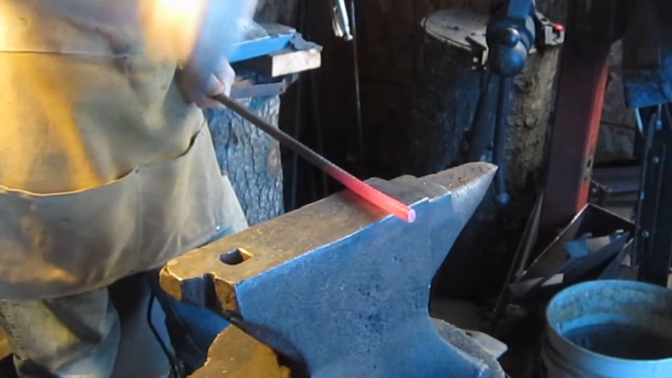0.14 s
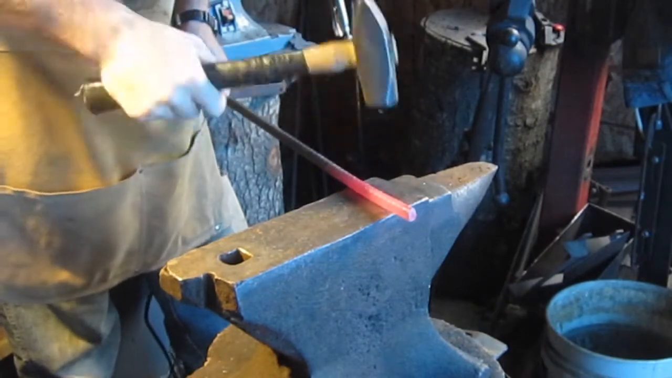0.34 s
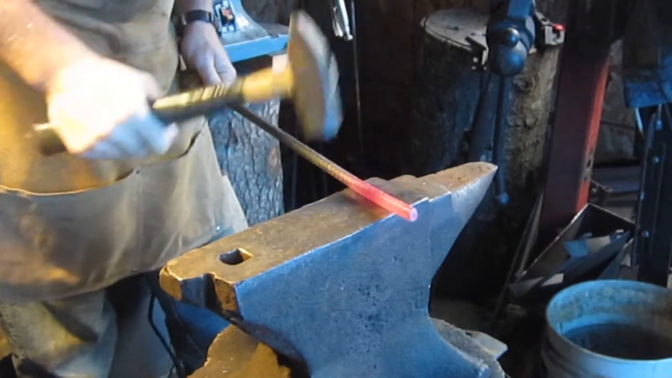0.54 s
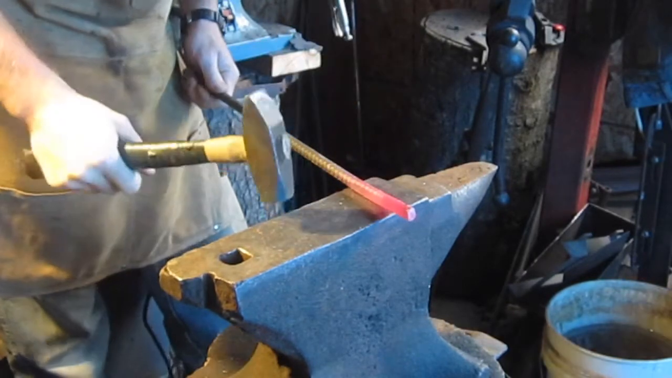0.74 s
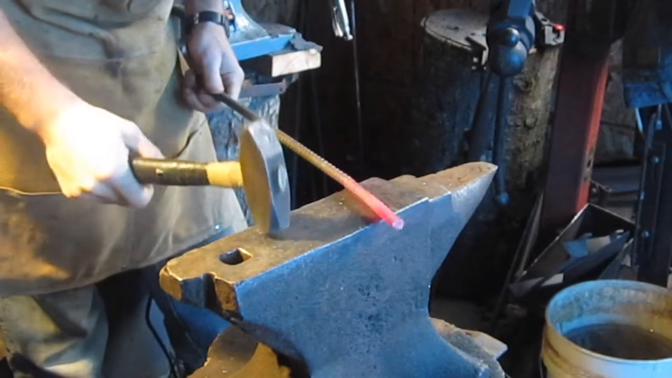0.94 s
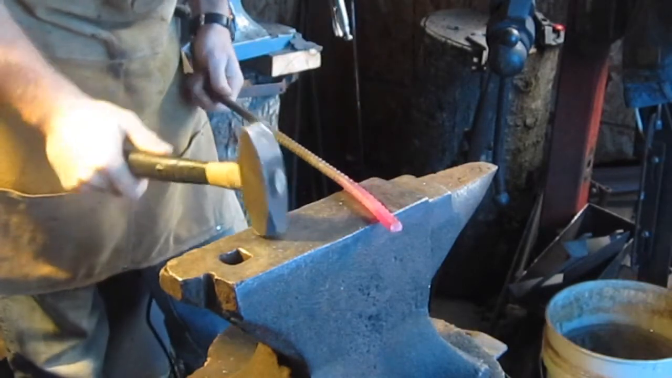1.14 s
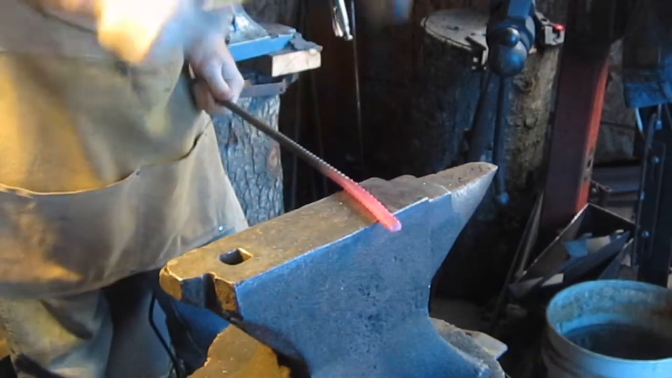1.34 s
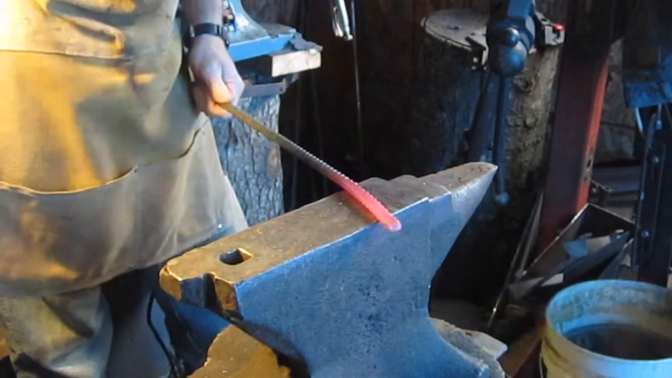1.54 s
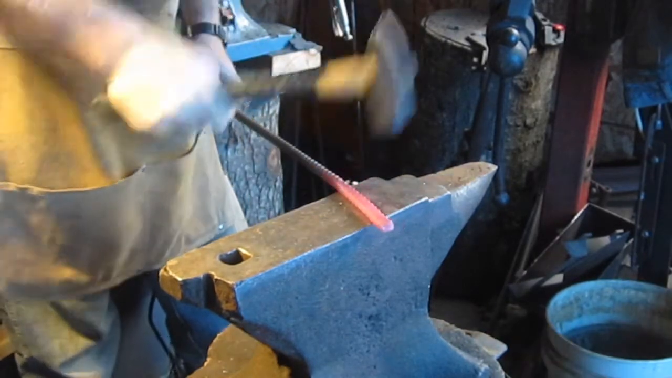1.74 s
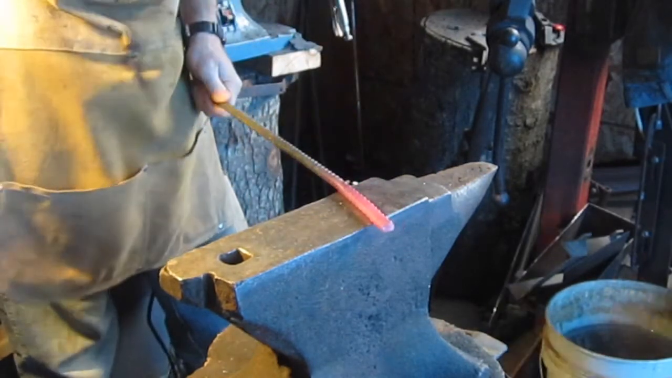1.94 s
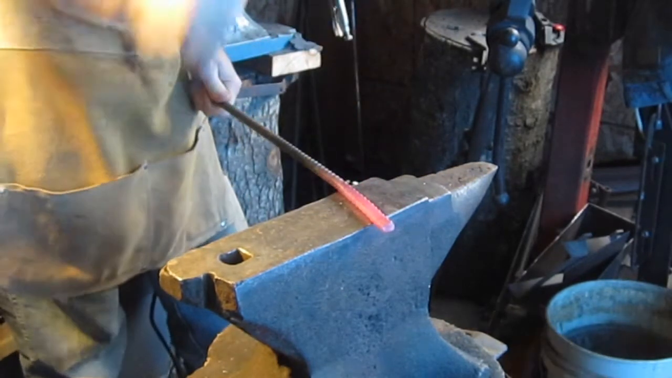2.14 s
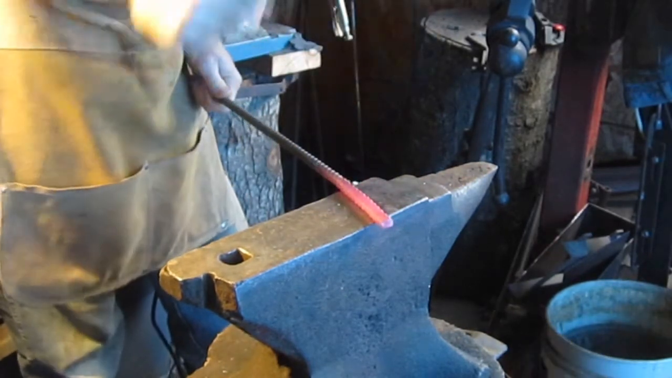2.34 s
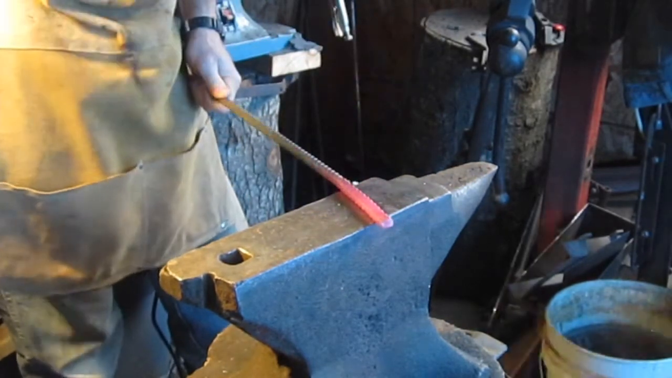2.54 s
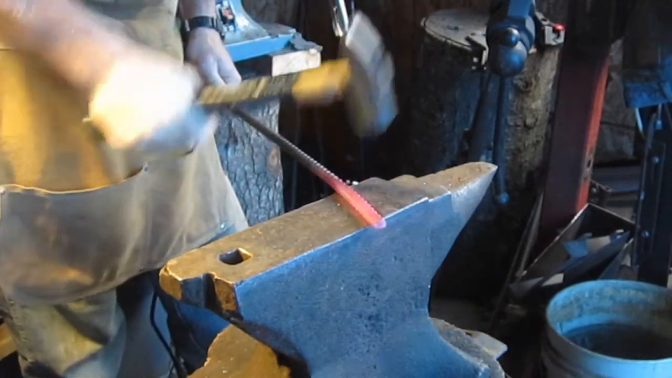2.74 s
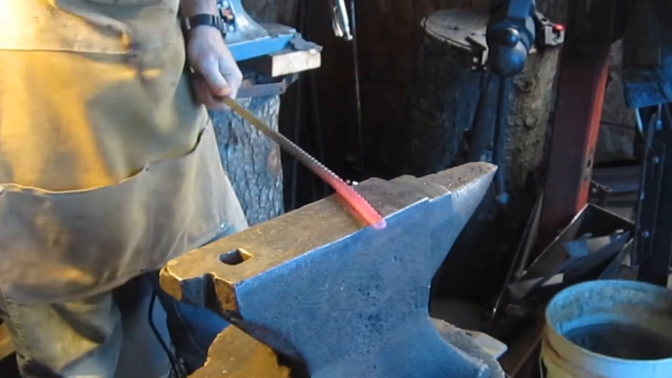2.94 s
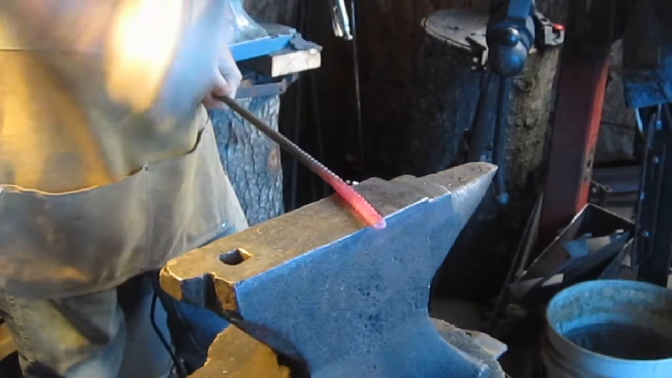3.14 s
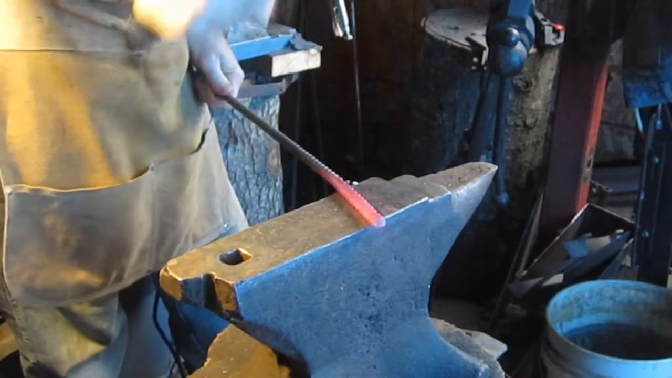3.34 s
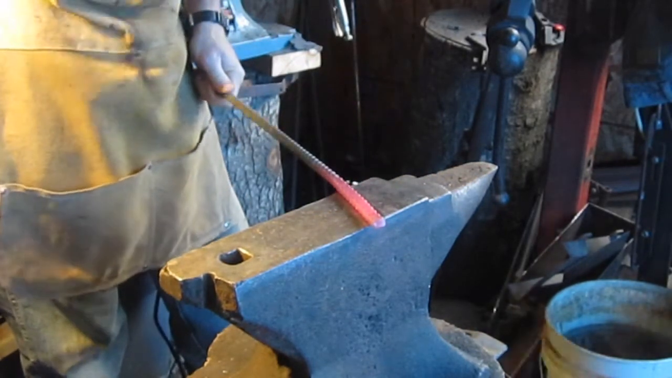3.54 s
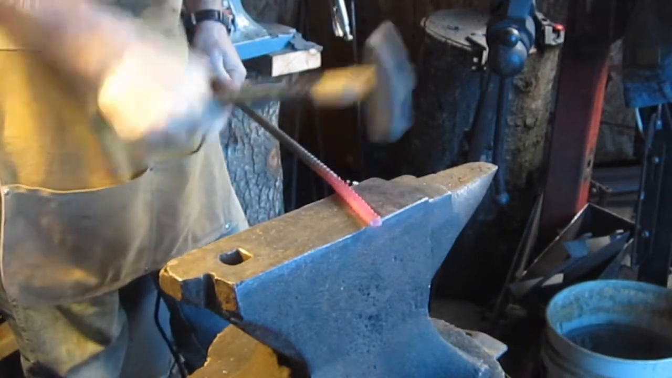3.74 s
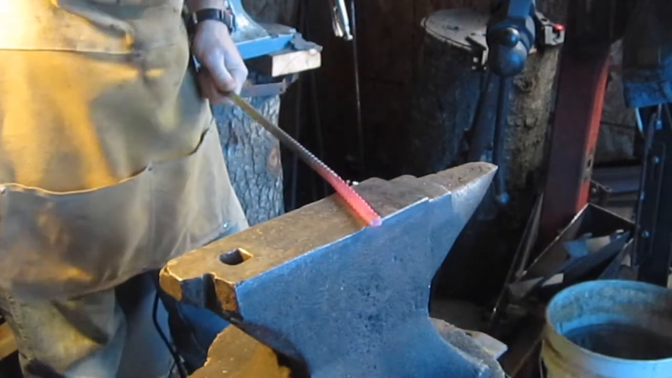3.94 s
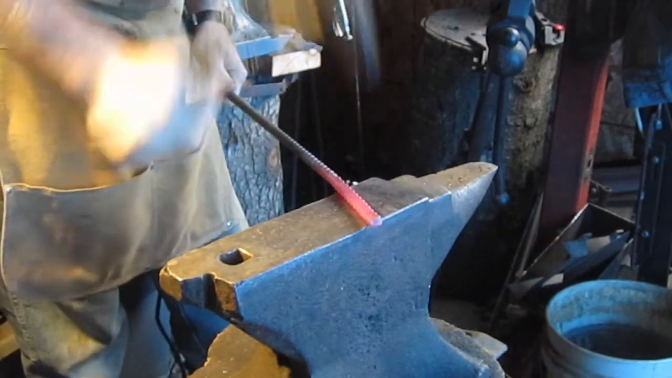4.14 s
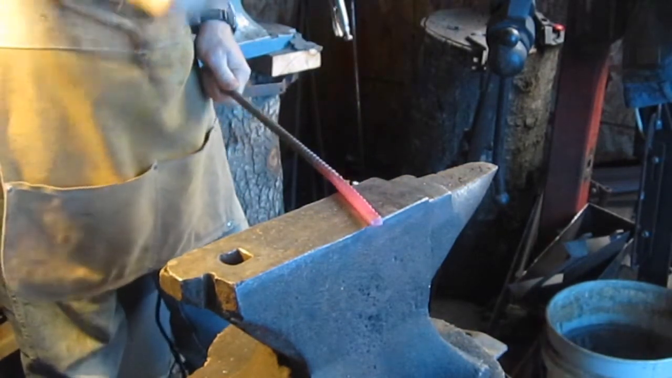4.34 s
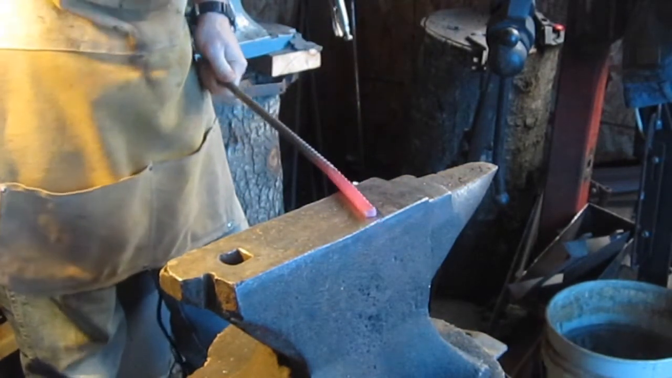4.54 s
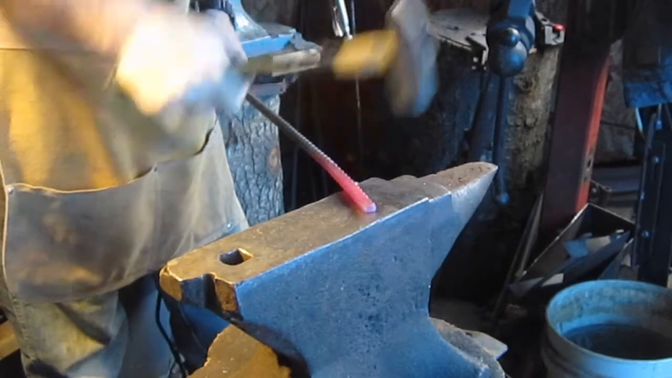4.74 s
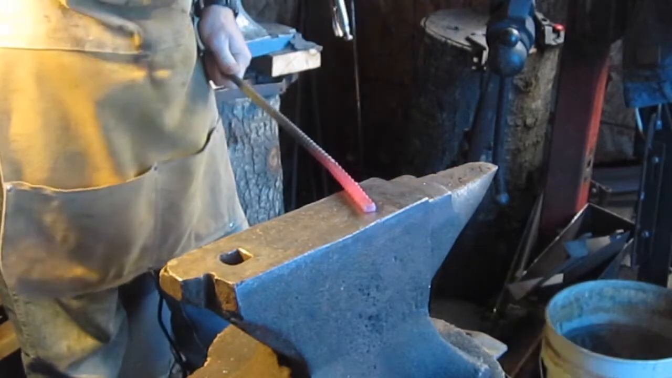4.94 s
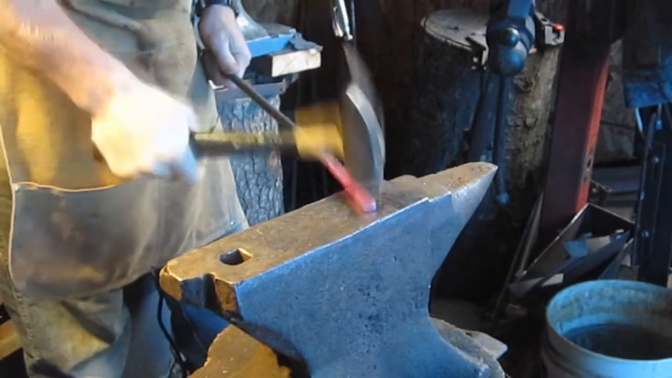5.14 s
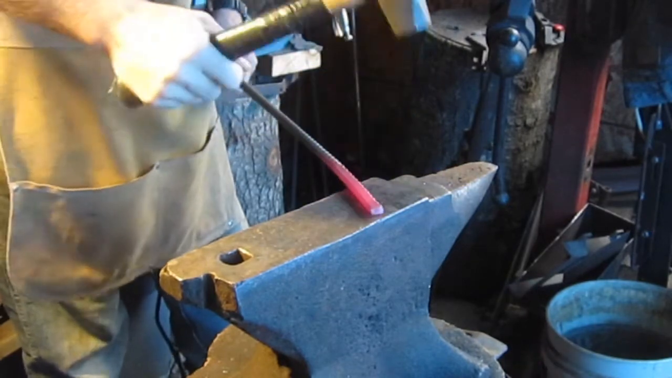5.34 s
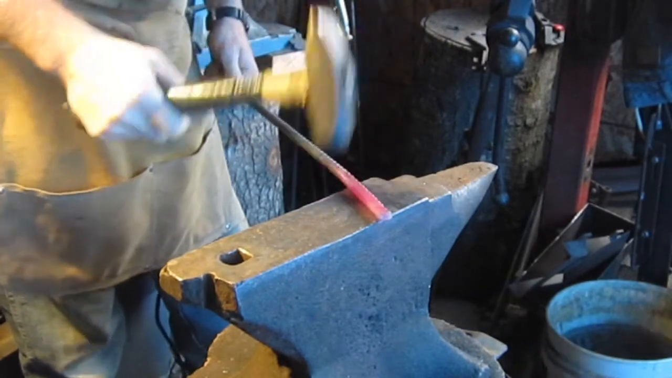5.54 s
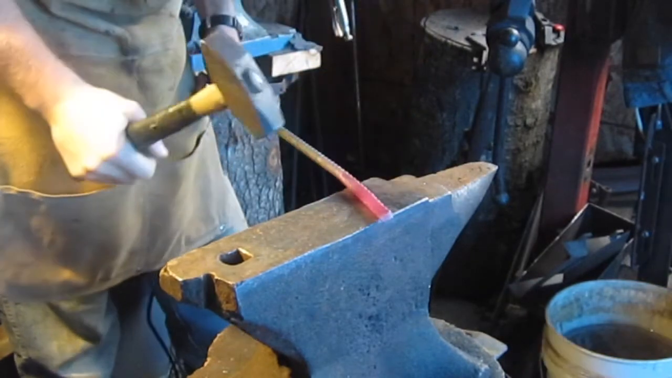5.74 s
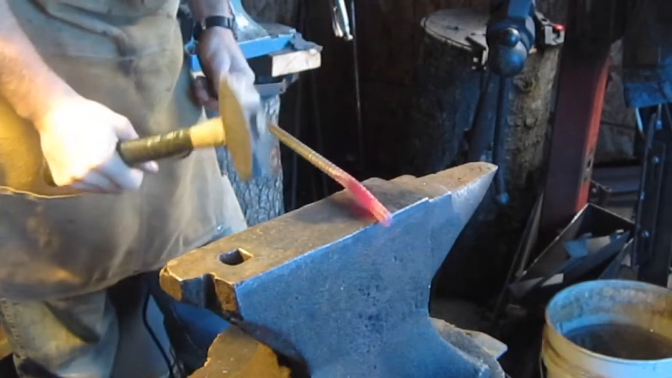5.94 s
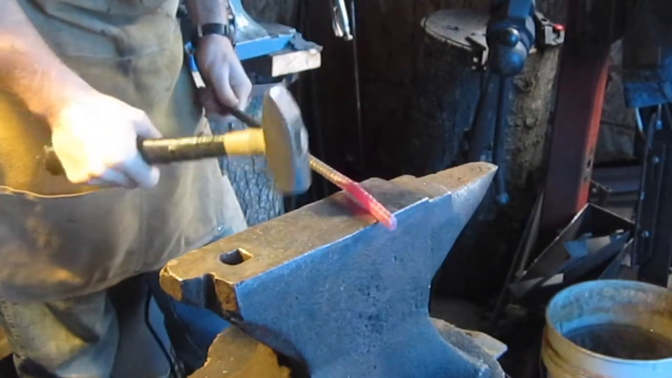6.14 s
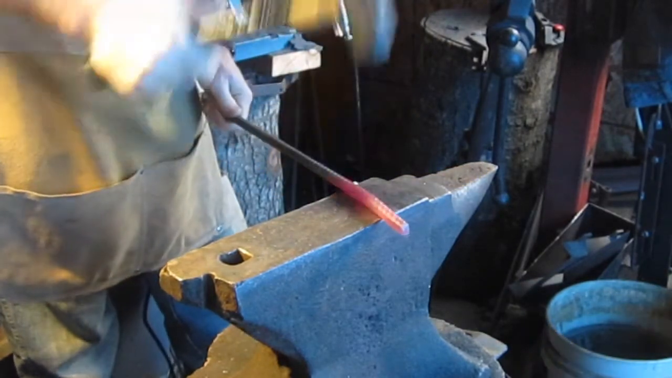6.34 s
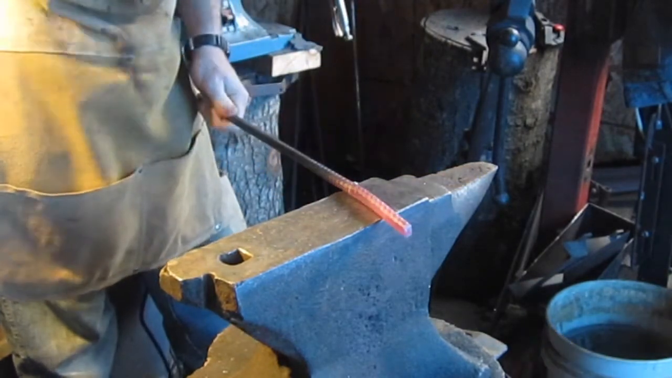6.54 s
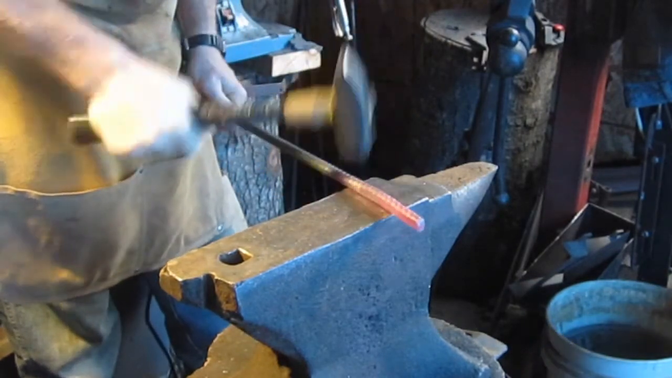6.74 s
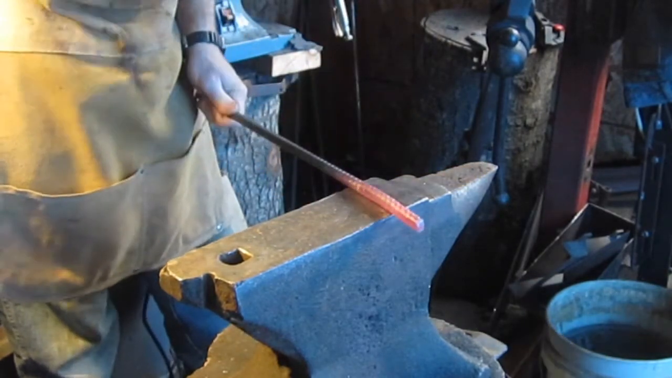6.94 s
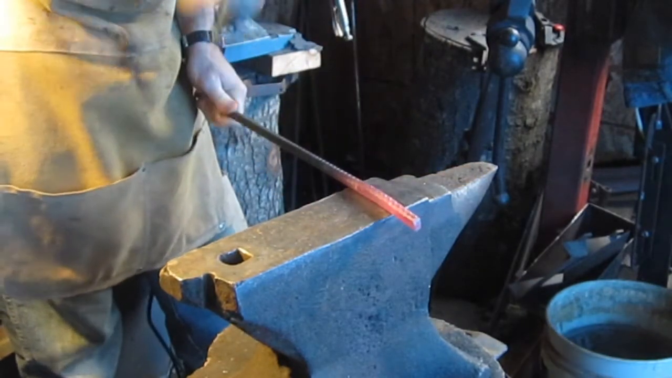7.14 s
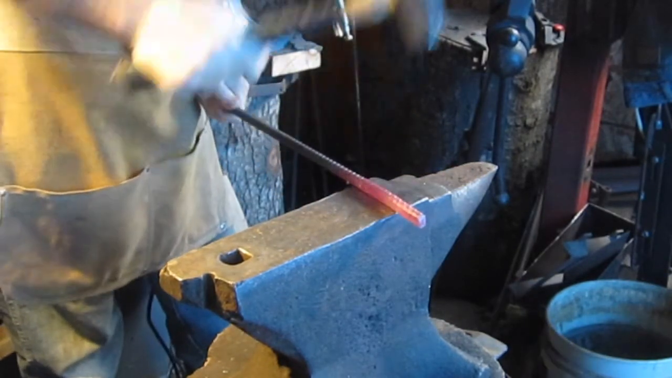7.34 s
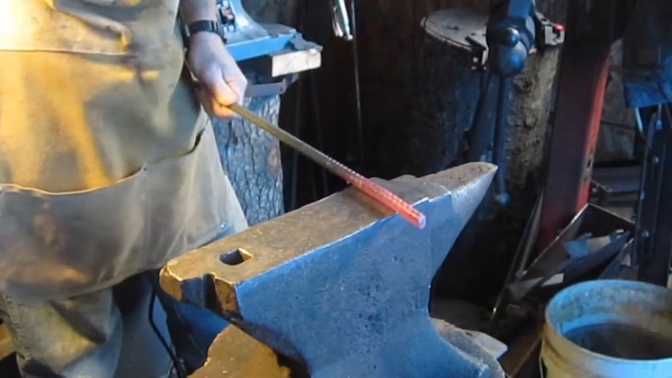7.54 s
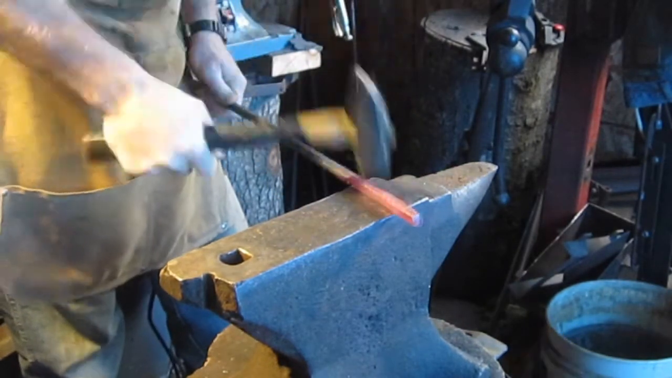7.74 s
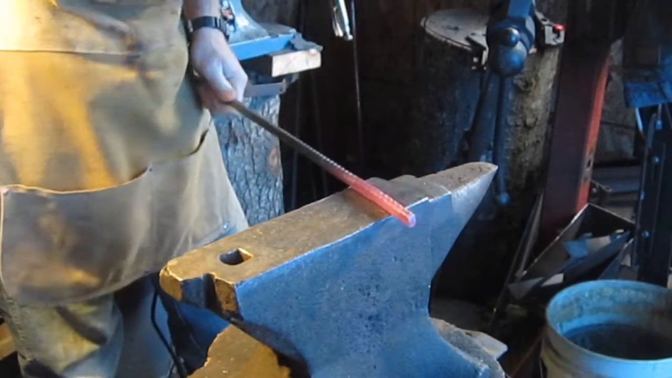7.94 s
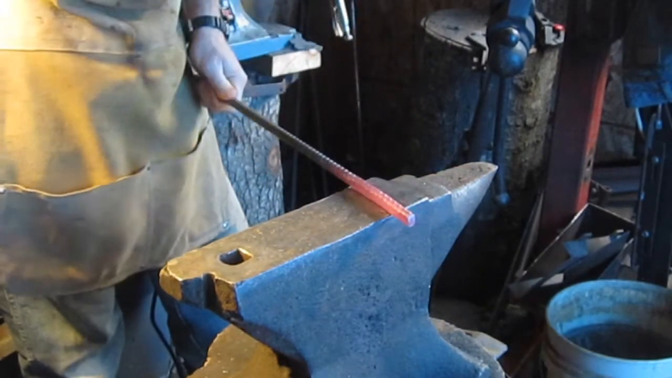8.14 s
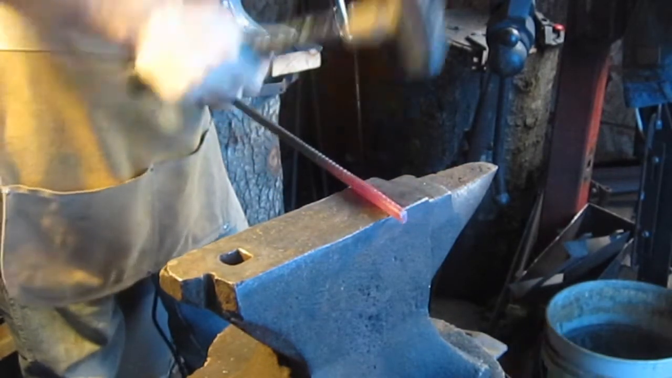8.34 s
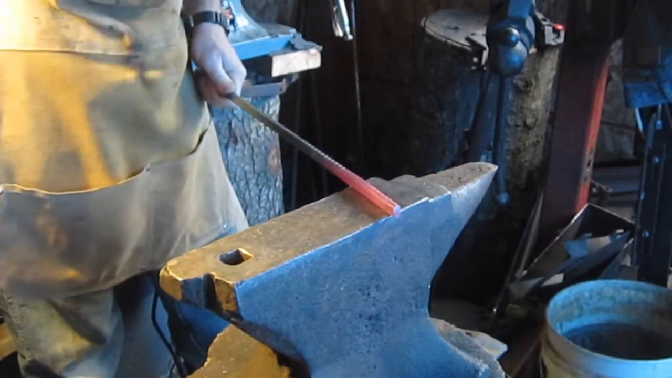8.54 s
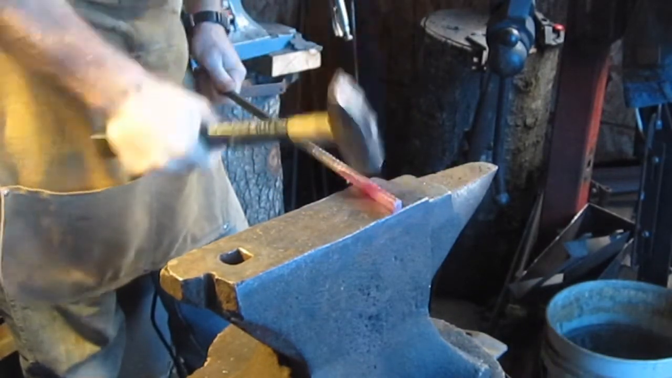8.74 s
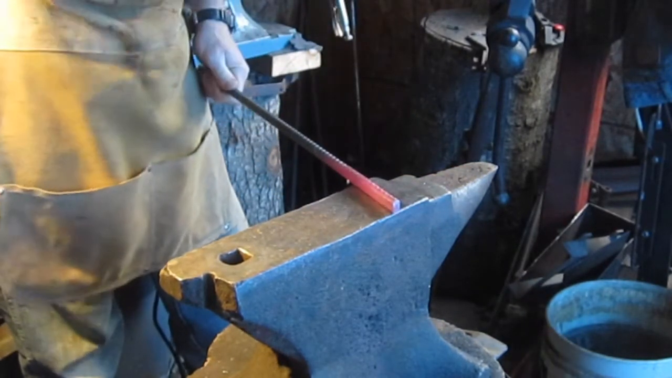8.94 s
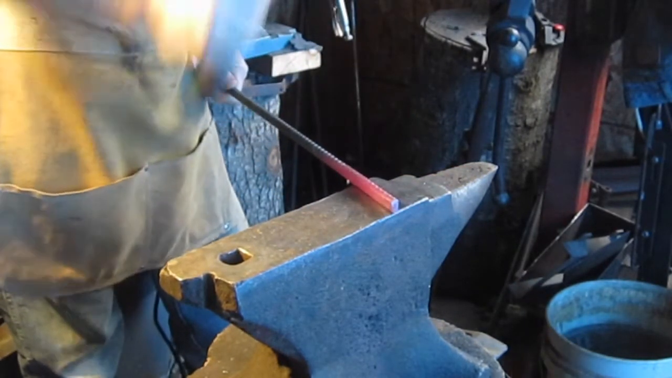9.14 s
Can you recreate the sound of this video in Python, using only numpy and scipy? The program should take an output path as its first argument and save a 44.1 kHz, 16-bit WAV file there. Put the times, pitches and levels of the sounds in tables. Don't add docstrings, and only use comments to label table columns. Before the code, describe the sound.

A hammer rings steadily on a hot steel bar over an anvil, with lighter bouncing taps between blows and a gas forge roaring low behind.

```python
import sys
import numpy as np
from scipy import signal
from scipy.fft import rfft, irfft
from scipy.io import wavfile
from scipy.ndimage import uniform_filter1d

SR = 44100
rng = np.random.default_rng(int(sys.argv[2]) if len(sys.argv) > 2 else 0)


def dump(signal):
    limited = np.clip(np.atleast_2d(signal).T, -1, 1)
    pcm = np.round(limited * 32767).astype(np.int16)
    wavfile.write(sys.argv[1], SR, pcm)


def how_loud(loudness_db):
    steps = np.asarray(loudness_db, float) / 20
    return 10 ** steps


N = 409235


def evened(x):
    return x / np.sqrt(np.mean(x ** 2) + 1e-20)


def read(points, hz):
    point_hz, value = np.transpose(points)
    return np.interp(np.log(hz + 1), np.log(point_hz + 1), value)


def add(mix, start_s, sound):
    part = mix[round(start_s * SR):][:len(sound)]
    part += sound[:len(part)]


def high_pass(x, hz):
    return signal.sosfilt(signal.butter(2, hz, "high", fs=SR, output="sos"), x)


def ring(modes, lift_db=0, rise_s=0.00048):
    hz, db, t60 = np.transpose(modes)[:3, :, None]
    t = np.arange(SR // 3) / SR
    dying = how_loud(db + lift_db - 60 * t / t60)
    sines = np.sin(2 * np.pi * hz * t)
    return (dying * sines).sum(0) * (1 - np.exp(-t / rise_s))


# frequency in Hz, level in dB per Hz.
ROAR_COLOUR = [(12, -48.5), (20, -8), (108, -9), (230, -0.5), (273, -17.5), (323, -6), (404, -3),
               (535, -16.5), (583, -7.5), (1240, -26.5), (1470, -21.5), (3420, -35.5), (11500, -38.5),
               (15200, -40), (16500, -61)]
# frequency in Hz, width in Hz, boost in dB.
FLAME_PEAKS = [(168, 10, 2), (253.8, 32, 8.5), (340, 30, 2.5), (431, 60, 7.5), (604, 11, 4), (4760, 900, 7),
               (8350, 74, 4), (10600, 140, 12), (11300, 330, 12.5), (12500, 300, 3.5)]
# time in seconds, draught in dB.
DRAUGHT = [(0.0, -2.5), (0.65, -1), (1.08, -1), (1.34, 2.5), (1.81, 1), (2.51, 2.5), (2.8, 1.3),
           (3.75, 1.5), (3.88, 0.27), (5.09, 0), (5.81, -1.5), (6.69, -0.36), (7.91, 1), (9.28, 0.7)]


def forge():
    level_db, patchy_db = -48.5, 2.0
    hiss_follows = 0.6
    frames = N // 256 + 5
    hz = np.fft.rfftfreq(1024, 1 / SR)
    real, imaginary, patches = rng.standard_normal((frames, 513, 3)).T

    patches = evened(uniform_filter1d(uniform_filter1d(patches, 10, 0), 16, 1))
    colour_db = read(ROAR_COLOUR, hz)
    for peak_hz, width_hz, db in FLAME_PEAKS:
        colour_db = colour_db + db / (1 + (2 * (hz - peak_hz) / width_hz) ** 2)

    draught_s, draught_db = np.transpose(DRAUGHT)
    t = (np.arange(frames) - 2) * 256 / SR
    roar_share = 1 / (1 + (hz[:, None] / 1200) ** 2)
    follows = roar_share + hiss_follows * (1 - roar_share)
    swing_db = follows * np.interp(t, draught_s, draught_db)

    spectrum = (real + 1j * imaginary) * how_loud(colour_db[:, None] + swing_db + patchy_db * patches)
    flame = signal.istft(spectrum, nperseg=1024, noverlap=768)[1][:N]
    return how_loud(level_db) * evened(flame)


# frequency in Hz, time to fall 60 dB in seconds.
WALLS = [(300, 0.28), (790, 0.1461), (2090, 0.147), (5510, 0.18), (14600, 0.1188)]


def smithy(x):
    first_echo_s, spacing = 0.0015, 12
    echoes = np.zeros(SR // 2)
    at = np.arange(round(first_echo_s * SR), len(echoes) - spacing, spacing)
    at = at + rng.integers(0, spacing, len(at))
    echoes[at] = rng.choice([-1., 1.], len(at))

    hz, t, spectrum = signal.stft(echoes, SR, nperseg=128)
    t60 = np.maximum(read(WALLS, hz), .05)[:, None]
    tail = signal.istft(spectrum * how_loud(-60 * t / t60), SR, nperseg=128)[1]
    return signal.fftconvolve(x, tail / np.linalg.norm(tail))[:N]


# frequency in Hz, level in dB, time to fall 60 dB in seconds, delay in seconds.
STUMP = [(32.5, -47, 0.29, 0.034), (137, -38, 0.071, 0.013), (212, -30, 0.099, 0.0045),
         (265, -13, 0.039, .003), (321.1, -30.5, 0.12, .025), (415, -25.5, 0.082, .002),
         (491, -34, 0.13, 0.0016), (544.6, -30, 0.089, 0.0026), (671, -27, 0.078, .002),
         (792, -34.5, 0.17, .002), (873.6, -28.5, 0.13, .002)]


def thud():
    out = np.zeros(SR)
    for mode in STUMP[1:]:
        add(out, mode[3], ring([mode], rise_s=0.0036))
    out = high_pass(out, 100)
    add(out, STUMP[0][3], ring(STUMP[:1], rise_s=0.0058))
    return out


# frequency in Hz, time to fall 60 dB in seconds.
LONG_MODES = [(2549, .27), (3347, .2), (5245, .15), (5005, .165)]
WAVE_SHAPES = [(3.57, .51), (.53, .38), (2.24, .36), (.8, .6)]
# level in dB where the wave swings widest, extra dB on the bare face.
LONG_LEVELS = [(-20, 0.5), (-18, 4.5), (-15, 8.5), (-25, 10.5)]


def long_rings(spot, bare):
    modes = []
    for (hz, t60), (waves, offset), (db, bare_db) in zip(LONG_MODES, WAVE_SHAPES, LONG_LEVELS):
        swing = abs(np.cos(np.pi * (waves * spot + offset))) + .04
        modes.append((hz, db + bare * bare_db + 20 * np.log10(swing), t60))
    heel = ring(modes[:1], rise_s=.025)
    return heel + ring(modes[1:], rise_s=0.0034)


# frequency in Hz, level in dB per Hz.
BAR_CONTACT = [(530, -31), (900, -2.5), (1260, -8), (3020, -2.5), (3320, -3), (4820, -6), (5440, -4.5),
               (5910, -7), (9550, -8), (15800, -21.5)]
# frequency in Hz, level in dB per Hz.
FACE_CONTACT = [(530, -39), (900, -5.5), (1990, -9), (2380, 0.5), (3320, -4), (4650, -8.5), (5120, -6),
                (5630, -14.5), (6130, -13), (8890, -33.5), (13200, -31), (15800, -52.5)]


def crack(hard_db, noise):
    rise_s, fade_s, rattle_db, rattle_t60 = 0.00059, 0.003163, -16, 0.13
    hz = np.fft.rfftfreq(len(noise), 1 / SR)
    t = np.arange(len(noise)) / SR
    on_bar = np.clip((hard_db + 23.5) / 16, -.6, 1.3)
    colour_db = on_bar * read(BAR_CONTACT, hz) + (1 - on_bar) * read(FACE_CONTACT, hz)

    rattle = how_loud(rattle_db - 60 * t / rattle_t60)
    shape = (np.exp(-t / fade_s) + rattle) * (1 - np.exp(-t / rise_s))
    burst = evened(irfft(rfft(noise) * how_loud(colour_db))) * shape
    return high_pass(burst, 500)


# start in seconds, strength in dB, landing spot along the face from 0 to 1,
# low short ring in Hz, high short ring in Hz.
BLOWS = [(0.2452, -1.5, 0.743, 3290, 5680), (1.7423, -0.5, 0.617, 4110, 8730),
         (2.2487, -0.5, 0.96, 3290, 8600), (2.7409, 0.5, 0.5, 3264, 7270), (3.2332, 0, 0.513, 2198, 7190),
         (3.7309, -1.5, 0.93, 2794, 7934), (4.214, 1, 0.05, 3290, 7310), (4.7064, -2.0, 0.487, 3287, 6106),
         (5.1868, 0, 0.32, 2815, 6120), (6.767, -4.5, 0.48, 3440, 5493), (7.276, -1, 0.563, 3560, 5530),
         (7.7836, 0, 0.133, 3170, 5973), (8.285, -1.0, 0.1, 2112, 8400), (8.771, -1, 0.597, 4077, 7970),
         (9.2623, -1, 0.023, 2179, 7960)]
# start in seconds, strength in dB, landing spot from 0 to 1,
# hardness as treble in dB.
TAPS = [
    (0.6935, -14, 0.42, -21.5),
    (0.861, -11, 0.82, -18),
    (0.979, -13.0, 0.547, -30),
    (1.0651, -16, 0.53, -32),
    (1.1312, -20.5, 0.803, -28.5),
    (1.1951, -26, 0.017, -34),
    (5.6534, -7.5, 0.27, -14.5),
    (5.927, -10, 0.367, -21),
    (6.1502, -11.5, 0.9, -20.5),
]


def strikes():
    hot_db, cooling_db_per_s = -10, 0.58
    hits = []
    for s, db, spot, *rings_hz in BLOWS:
        hits.append((s, db, spot, hot_db + cooling_db_per_s * s, rings_hz, False))
    for tap in TAPS:
        hits.append((*tap, (3213, 6060), True))
    return sorted(hits)


# frequency in Hz, level in dB, time to fall 60 dB in seconds.
ANVIL = [(920, -28, 0.12), (1733, -27.5, 0.12), (1923, -30, 0.17), (2212.5, -28.5, 0.14), (2423, -29, 0.15),
         (2805, -27, 0.15), (3840, -30, 0.047), (4030, -28, 0.11), (4720, -31, .1), (6100, -33.5, 0.11),
         (6010, -26, 0.1), (7140, -37, .09), (7080, -32, 0.062), (7341, -39.5, 0.11), (8450, -40.5, .09),
         (12100, -41, 0.086)]
# frequency in Hz, level in dB, time to fall 60 dB in seconds.
KNOCK = [(2430, -5.5, 0.011), (3290, -17.5, 0.07)]
# frequency in Hz, level in dB, time to fall 60 dB in seconds.
BAR = [(3450, -26, .06), (4160, -22.5, 0.06), (4380, -27, 0.069), (5510, -25, 0.024), (6680, -22.5, 0.041),
       (7140, -18, 0.024), (7960, -17.5, 0.034), (8456, -21, 0.048), (9240, -25, .06), (9970, -19, 0.046),
       (10570, -22, 0.054), (11430, -26, 0.084), (12100, -26.5, .04), (13770, -30, 0.045),
       (14500, -31, .05), (15100, -34, .05)]


def metal_clank(db, hard_db, bare, noise, luck):
    spread_db = 2 * luck[:, :1]
    detune = 1 + [.008, 0, 0] * luck[:len(BAR), 1:]
    bar_db = (-10 if bare else 0.5 + db) + 1.3 * (hard_db + 8)
    sound = how_loud(db) * (ring(ANVIL, spread_db[-len(ANVIL):]) + ring(KNOCK, rise_s=0.00013))
    sound += how_loud(bar_db) * ring(np.array(BAR) * detune, spread_db[:len(BAR)])
    add(sound, 0, how_loud(db - 3.5) * crack(hard_db, noise))
    return sound


# frequency in Hz, level in dB, time to fall 60 dB in seconds.
SLAP = [(1900, 2.5, .0035), (3600, -0.5, .004), (12000, -8, 0.0033)]
# frequency in Hz, level in dB, time to fall 60 dB in seconds.
TURNED = [(4520, -22, .16), (5410, -13.5, .1), (5515, -12.5, 0.15), (6695, -20, .17), (7960, -22.5, .1)]
# frequency in Hz, level in dB, time to fall 60 dB in seconds.
BARE = [(920, -19.5, 0.091), (1732, -21.5, 0.1), (2430, -21, .08), (2828, -16, .13), (3070, -35, 0.087),
        (3220, -8, 0.046), (3320, -14.5, .12), (4100, -19, 0.17), (4240, -18, 0.1), (6700, -29, .12)]


def hammer():
    turn_s = 6.5
    clanks, body = np.zeros((4, N)), np.zeros(N)
    stump, hits = thud(), strikes()
    noise = rng.standard_normal((len(hits), 8192))
    luck = rng.standard_normal((len(hits), 40, 2))
    for k, (s, db, spot, hard_db, (low_hz, high_hz), bare) in enumerate(hits):
        add(clanks[k % len(clanks)], s, metal_clank(db, hard_db, bare, noise[k], luck[k]))

        low_db, high_db = (-10.5, -21.5) if bare else (-17, -18)
        short_rings = [(low_hz, low_db, .09), (high_hz, high_db, .13)]
        add(body, s, how_loud(db) * ring(short_rings, rise_s=0.00066))
        if bare or s > turn_s:
            add(body, s, how_loud(db) * ring(BARE if bare else TURNED, rise_s=.003))
        if not bare:
            add(body, s, how_loud(db) * ring(SLAP, rise_s=.0002))
        add(body, s, how_loud(db) * long_rings(spot, bare))
        add(body, s, how_loud(7 + .9 * db - 2.5 * bare) * stump)
    return clanks, body


def scene():
    clanks, body = hammer()
    echoes = smithy(how_loud(-13.5) * body)
    for clank in clanks:
        echoes = echoes + smithy(how_loud(-1.5) * clank)
    return (clanks.sum(0) + body + echoes + forge())[None]


def grip(power_db, threshold_db, ratio, release_db):
    fall = np.arange(N) * release_db / SR
    held_db = np.maximum.accumulate(power_db + fall) - fall
    return ratio * np.maximum(held_db - threshold_db, 0)


def low_pass(x):
    return signal.sosfilt(signal.butter(12, 16860, fs=SR, output="sos"), x)


def record(dry):
    power_db = 10 * np.log10(signal.lfilter([.02], [1, -.98], dry[0] ** 2) + 1e-12)
    limiter_db = grip(power_db, -8.5, 0.42, release_db=299.5)
    slow_db = grip(power_db, -17.5, 0.079, release_db=20.5)
    held = np.tanh(dry / how_loud(limiter_db + slow_db) * 1.25) / 1.25
    held = signal.sosfilt(signal.cheby1(8, 1, 15900, fs=SR, output="sos"), held)
    return low_pass(held)


dry = scene()
out = record(dry)
dump(out)
```